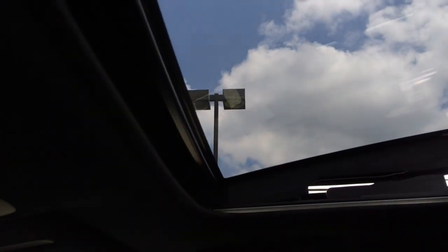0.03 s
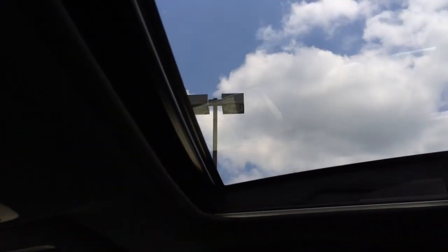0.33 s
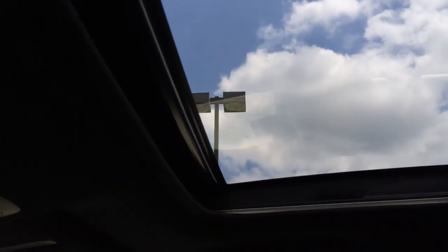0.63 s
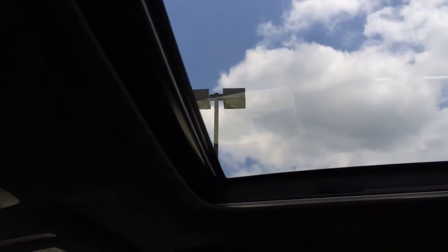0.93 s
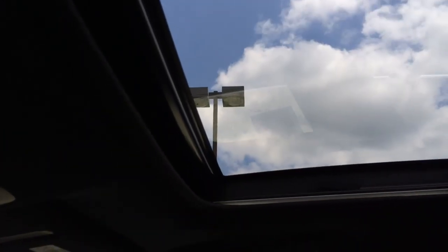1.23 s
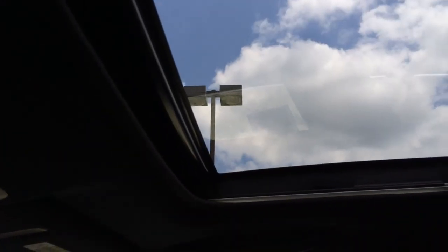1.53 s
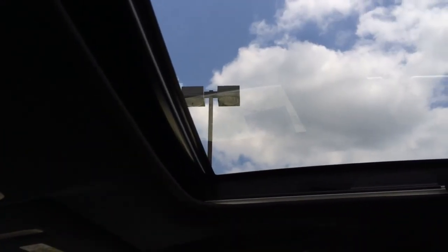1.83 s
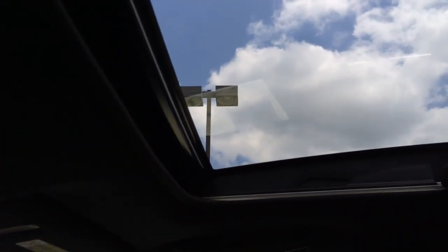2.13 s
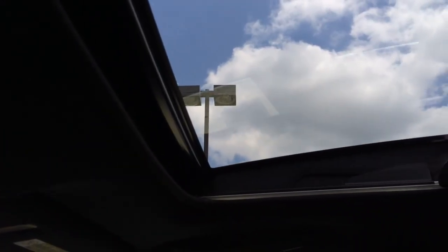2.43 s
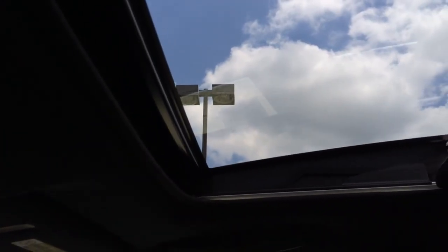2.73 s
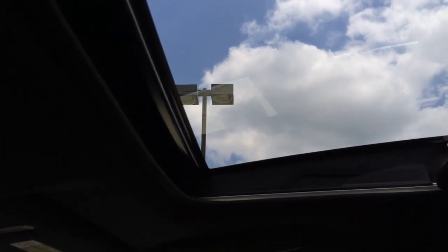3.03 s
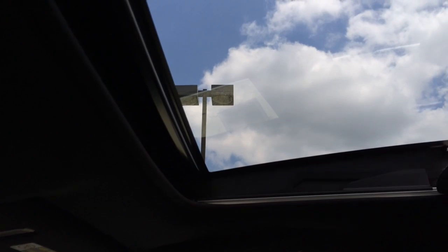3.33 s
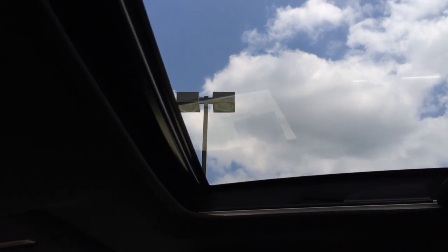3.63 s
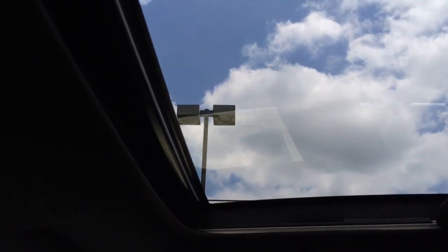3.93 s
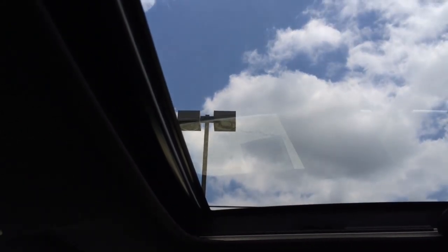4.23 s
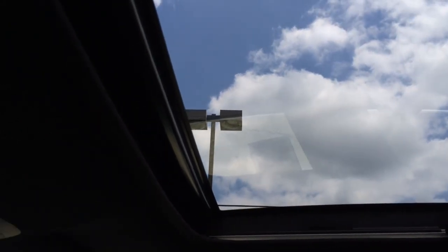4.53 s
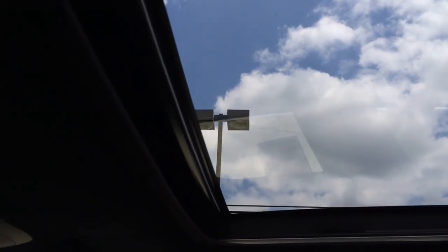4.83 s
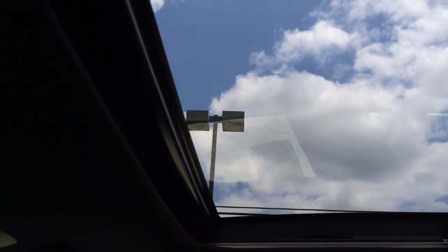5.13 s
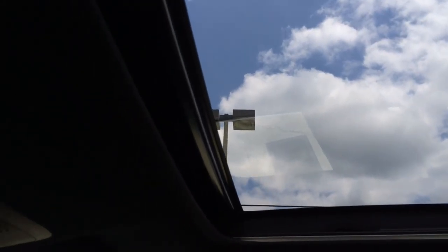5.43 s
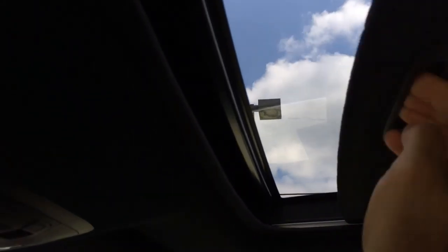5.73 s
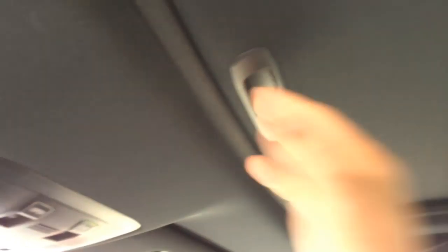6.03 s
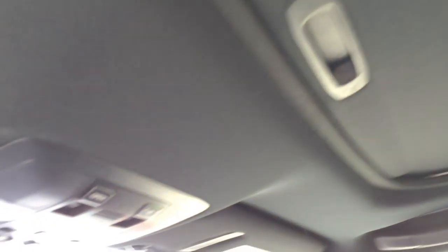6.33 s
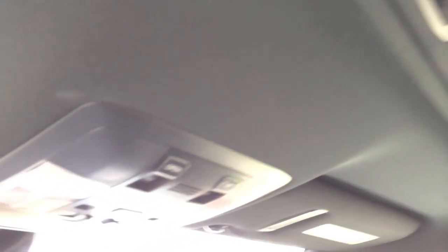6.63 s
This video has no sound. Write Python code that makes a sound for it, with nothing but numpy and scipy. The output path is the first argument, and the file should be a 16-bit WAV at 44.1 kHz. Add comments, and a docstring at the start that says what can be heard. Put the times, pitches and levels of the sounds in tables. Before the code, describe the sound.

Inside an idling car, a sunroof motor whines in three short runs with switch clicks, then the sunshade slides shut with a thump.

```python
"""A sunroof motor whines and sags under load, over the hum of an idling car and its blowing vents.
It runs three times: the lifting arms and the switch clack, and the glass bumps into its rubber seal.
Distant tyres roar through the gap, louder the wider the roof is open, and a sleeve rustles.
Then a hand slides the sunshade shut: fabric hisses along the rails and the shade booms on its stop."""
import sys
import numpy as np
from scipy import signal
from scipy.fft import rfft, irfft, next_fast_len
from scipy.io import wavfile
from scipy.ndimage import uniform_filter1d, map_coordinates

SR = 44100
rng = np.random.default_rng(int(sys.argv[2]) if len(sys.argv) > 2 else 0)


def generate_wav(signal):
    """Clip the signal to [-1, 1] and save it as 16-bit WAV at the path in sys.argv[1]."""
    frames = np.transpose(np.atleast_2d(signal))
    scaled = np.clip(frames, -1, 1) * 32767
    pcm = np.round(scaled).astype(np.int16)
    wavfile.write(sys.argv[1], SR, pcm)


N = 294134

# A COLOUR table says how strong a noise is at each frequency; t60 is the time to fade by 60 dB.
# when the motor runs: (start t/s, stop t/s)
MOTOR_RUNS = [(-.05, .865), (1.765, 2.345), (3.405, 3.92)]
# pitch of the whine, which follows motor speed, one list per run: (t/s, f/Hz)
WHINE_PITCH = [
    [(.06, 725), (.103, 672), (.16, 722), (.22, 744), (.26, 652), (.305, 727), (.39, 711), (.5, 720),
     (.55, 752), (.63, 721), (.82, 700)],
    [(1.8, 667), (1.92, 666), (1.99, 618.4), (2.07, 604), (2.105, 625.6), (2.205, 575), (2.24, 615),
     (2.265, 661), (2.34, 679)],
    [(3.41, 706), (3.53, 715), (3.585, 762), (3.68, 721.6), (3.82, 703), (3.92, 707)],
]
# how loudly the roof gives off the whine at each pitch: (f/Hz, level/dB)
WHINE_LOUDNESS = [(575, -40.5), (604, -39.5), (617, -42.5), (626, -51), (652, -55), (666, -38.5),
                  (690, -43), (718, -43.5), (735, -51), (760, -42)]
# side tones from the turning shaft: (multiple of the whine's pitch, level/dB before the housing)
SHAFT_TONES = [(.5, -61.5), (.9, -69), (1.118, -61.5), (1.885, -59.5), (2, -70)]
# the motor housing lifts some side tones and weakens others: (f/Hz, level/dB)
HOUSING_BOOST = [(600, 1), (750, -9), (795, 6), (835, 17.5), (900, -6), (1250, -7), (1370, 1.5),
                 (1600, -12)]
# hiss of the brushes, the motor's sliding contacts: (f/Hz, level/dB)
BRUSH_COLOUR = [(250, -2.5), (500, 4.5), (1100, 0), (1700, -5), (2500, -11), (3800, -11), (5000, -13.5),
                (6000, -12.5), (7000, -16.5), (9500, -20), (12000, -18.5), (13500, -23), (15000, -26)]

# tones of the idling engine: (multiple of the firing rate, level/dB)
ENGINE_TONES = [(1, -45.5), (2, -57), (3, -48), (4, -56), (6, -58.5)]
# low rumble in the car's body: (f/Hz, level/dB)
RUMBLE_COLOUR = [(22, -23), (31, -1.5), (45, -8), (70, 6.5), (88, -2), (120, 4), (165, -2.5), (200, -0.5),
                 (230, -4.5), (275, -15.5), (340, -17.5), (450, -22.5), (800, -63.5)]
# roar of moving air: (f/Hz, level/dB)
AIR_COLOUR = [(180, -34.5), (310, -1), (430, -8), (510, -3), (630, -8), (950, -2.5), (1150, -3.5),
              (1750, -7), (2250, -13), (3400, -26), (8000, -43), (11000, -40), (15000, -45)]
# hiss of the vents, stronger as they come into line: (t/s, level/dB)
VENT_HISS_LEVEL = [(5, -71), (5.9, -66.5), (6.29, -52.5), (6.4, -58.5), (6.5, -56.5), (6.66, -59.5)]
# outside sound let in by the roof gap: (t/s, share from 0 to 1)
ROOF_GAP = [(0, 1), (.45, 0.59), (.87, 0.09), (1.77, 0.15), (2.34, 0.75), (2.72, 0.82), (3.4, 0.52),
            (3.92, 0.06), (5.9, 0.16)]
# roar of distant tyres: (f/Hz, level/dB)
TYRE_COLOUR = [(600, -28), (850, 0.5), (960, 13), (1150, -2), (1400, 7.5), (1780, 8.5), (2050, -13),
               (3000, -30)]

# the lifting arms pass a notch: (t/s, first level/dB, second level/dB, glass level/dB, ring f/Hz)
ARM_NOTCHES = [(.078, -20.5, -30.5, -28.5, 1170), (.236, -32, -34, -25, 990),
               (.528, -26, -24.5, -24.5, 1700), (3.58, -22, -22.5, -21.5, 1620)]
# clack of the sunroof frame: (f/Hz, level/dB)
FRAME_COLOUR = [(400, -20.5), (650, 3.5), (820, -6), (1000, 2), (1100, -1), (1205, -1), (1320, -3.5),
                (1450, -0.5), (1700, -2), (2300, -13.5), (4000, -19.5), (8000, -64.5)]
# notes of the knocked roof panel: (f/Hz, level/dB, t60/s)
PANEL_NOTES = [(342, 2, 0.075), (392, -4.5, 0.057), (502, 3.5, 0.046)]
# snap of plastic: (f/Hz, level/dB)
SNAP_COLOUR = [(1200, -24), (2650, 7), (3100, 7.5), (3700, 5), (4500, 6), (5200, 2), (6500, -2),
               (9000, -9.5), (14000, -46)]
# thin, high tick of a hit: (f/Hz, level/dB)
TICK_COLOUR = [(4000, -16), (8000, -2), (12000, .5), (15500, -8)]
# clicks of switch, drive and handle; contact() turns each part down by its own amount:
# (t/s, clack level/dB, knock level/dB, snap level/dB, tick level/dB, ring f/Hz)
HARD_CLICKS = [(.292, -31.5, -37, -51, -59, 860), (.858, -26.5, -31, -43, -40.5, 2080),
               (1.242, -31, -35.5, -59, -50, 1410), (1.279, -34, -57, -39.5, -51, 1440),
               (1.681, -33.5, -42, -44, -59, 1720), (1.77, -2, -27.5, -15.5, -21, 1213),
               (2.335, -22.5, -42, -42, -46, 1374), (2.341, -18, -23, -26.5, -41, 2045),
               (2.611, -19.5, -33, -29.5, -44, 2260), (2.725, -31.5, -58, -39.5, -31.5, 2480),
               (3.393, -8.5, -21.5, -27, -52, 1783), (3.407, -13.5, -24, -26, -34.5, 660),
               (3.913, -28.5, -26.5, -42, -42.5, 1280), (4.333, -31.5, -60, -46.5, -51.5, 750.2),
               (5.234, -36.5, -42, -71, -62, 927), (5.26, -28.5, -30, -37.5, -66, 730)]
# the gears chatter as they take up their slack: (t/s, number of hits, first level/dB)
GEAR_CHATTER = [(1.734, 3, -21), (3.381, 1, -27)]

# the glass comes down on its seal: (t/s, level/dB)
GLASS_LANDINGS = [(0.605, -19.5), (3.655, -18.5)]
# one landing, edge first and then the whole pane: (delay t/s, added level/dB, f/Hz, t60/s)
SEAL_NOTES = [(0, -1, 181, .08), (.022, -3.5, 44.2, 0.51), (.025, -4, 105, .11)]
# drive or hand jolts the trim: (t/s, level/dB, f/Hz, t60/s)
TRIM_JOLTS = [(1.745, -29, 94, .2), (2.338, -29.5, 204.9, .12), (3.381, -28, 325, 0.055),
              (5.002, -35.5, 333, 0.14), (5.035, -23.5, 142, 0.11)]
# sleeve, fingers and seal rustle: (peak t/s, level/dB, rise t/s, fall t/s, lower edge f/Hz)
RUSTLE_SWELLS = [(.735, -53, 0.036, .02, 8970), (2.74, -53, .01, 0.069, 6984),
                 (2.81, -62, .01, 0.023, 5000), (3.05, -62.5, .08, 0.23, 8000), (4.36, -65, .03, .15, 6000),
                 (4.84, -67, .15, .4, 8040), (5.04, -56.5, 0.33, 0.091, 2500),
                 (5.152, -60, .01, 0.028, 3000), (5.224, -63.5, 0.016, 0.11, 2500),
                 (5.308, -59, .01, 0.035, 5000), (5.42, -56, .02, 0.021, 3000),
                 (6.06, -57, 0.04, .06, 7000), (6.66, -67, .6, .1, 7000)]
# hiss of rubbed fabric: (f/Hz, level/dB)
FABRIC_COLOUR = [(1500, -18), (3200, 3), (5000, 3), (9000, -1), (12000, 0), (15000, -5)]

# how hard the shade rubs, rising with its speed: (t/s, relative level/dB)
SHADE_RUBBING = [(5.45, -62), (5.488, -57), (5.616, -53), (5.648, -44.5), (5.78, -46.5), (5.818, -42.5),
                 (5.834, -45.5), (5.91, -42.5)]
# scrape of the shade's rails: (f/Hz, level/dB)
RAIL_SCRAPE_COLOUR = [(2000, -13.5), (3300, -24), (3900, -3), (4800, -1.5), (6300, -2), (7500, -7.5),
                      (12000, -11.5)]
# the shade hits its stop and bounces: (t/s, boom level/dB, crack level/dB)
SHADE_HITS = [(5.924, -18, -27.5), (5.9327, -6.5, -20), (5.958, -9.5, -53)]
# booming notes of the ceiling lining: (f/Hz, level/dB, t60/s)
LINING_NOTES = [(52.4, 5.5, 0.24), (73, 3.5, 0.12), (99, 1, 0.19), (136.6, 0, 0.22), (191, 0, 0.15),
                (272, -3, .08), (354, -4, 0.13), (443, -12, .11), (555, -16, .046)]
# crack of the shade's handle: (f/Hz, level/dB)
HANDLE_COLOUR = [(250, 1), (600, -1), (900, -0.5), (1500, -5), (1950, 2), (2400, -14.5), (3500, -16.5),
                 (7000, -16.5), (10000, -17), (15000, -27)]
# quick echoes from the windows: (delay t/s, level/dB)
WINDOW_ECHOES = [(.0021, -27.5), (.0037, -27), (.0058, -17.5), (.0083, -22)]


def amp(db):
    """Turn decibels into a number to multiply by."""
    return 10 ** (np.asarray(db) / 20)


def unit(x):
    """Scale a sound to an average strength (rms) of 1."""
    return x / np.sqrt(np.mean(x ** 2) + 1e-20)


def clock(size):
    """The time of each sample in seconds."""
    return np.arange(size) / SR


def curve(rows):
    """Join (t/s, value) points with straight lines, one value per sample."""
    return np.interp(clock(N), *np.transpose(rows))


def wobble(rate):
    """A smooth curve through `rate` random values a second."""
    knots = rng.standard_normal(int(N * rate / SR) + 4)
    return map_coordinates(knots, [np.arange(N) * rate / SR])


def colour(x, points):
    """Shape a sound's lows and highs to follow (f/Hz, level/dB) points."""
    size = 2 * next_fast_len(len(x) // 2 + 4096)
    hz, db = np.transpose(points)
    gain = amp(np.interp(np.log(np.fft.rfftfreq(size, 1 / SR) + 1), np.log(hz), db))
    # folding this onto its first half makes the filter ring after a hit, never before it
    cepstrum = irfft(np.log(gain))
    cepstrum[1:size // 2] *= 2
    cepstrum[size // 2 + 1:] = 0
    return irfft(rfft(x, size) * np.exp(rfft(cepstrum)))[:len(x)]


def treble(x, hz):
    """Keep what lies above hz."""
    return signal.sosfilt(signal.butter(2, hz, "highpass", fs=SR, output="sos"), x)


def noise(points):
    """Steady noise of strength 1 with the given colour."""
    return unit(colour(rng.standard_normal(N), points))


def crest(x):
    """Scale a hit so that its loudest 4 milliseconds have strength 1."""
    return x / np.sqrt(uniform_filter1d(x ** 2, size=176).max())


def add(track, s, sound):
    """Mix a sound in at s seconds."""
    part = track[round(s * SR):][:len(sound)]
    part += sound[:len(part)]


def motor():
    """The whine follows the motor's speed and swells where the roof rings along; the brushes hiss."""
    t, out = clock(N), np.zeros(N)
    brushes = noise(BRUSH_COLOUR)
    for (start, stop), pitch in zip(MOTOR_RUNS, WHINE_PITCH):
        running = np.clip((t - start) / 0.023, 0, 1) * np.clip((stop - t) / 0.01 + .5, 0, 1)
        hz = curve(pitch)
        phase = 2 * np.pi * np.cumsum(hz * (1 + 0.00602 * wobble(90))) / SR
        sides = sum(amp(db + np.interp(k * hz, *np.transpose(HOUSING_BOOST))) * np.sin(k * phase)
                    for k, db in SHAFT_TONES)
        sides *= amp(1.1 * wobble(26.36))
        whine_db = np.interp(hz, *np.transpose(WHINE_LOUDNESS)) + 1.1 * wobble(60)
        whine = np.sqrt(2) * (amp(whine_db) * np.sin(phase) + sides)
        surge_db = 7 * np.exp(-np.abs(t - start) / 0.058)  # the starting current lifts the hiss
        pulsing = 1 + 0.43 * np.sin(phase)  # the spinning contacts pass under the brushes
        out += running * (whine + amp(-51.5 + surge_db) * brushes * pulsing)
    return out


def engine(firing_hz=35.7):
    """The idling engine drones and rumbles through the car's body."""
    phase = 2 * np.pi * np.cumsum(firing_hz * (1 + 0.0083 * wobble(3))) / SR
    drone = sum(amp(db + 0.18 * wobble(14)) * np.sin(k * phase + rng.uniform(0, 2 * np.pi))
                for k, db in ENGINE_TONES)
    rumble = amp(-40.5 + 2.2 * wobble(5.9)) * noise(RUMBLE_COLOUR)
    return np.sqrt(2) * drone + rumble


def air(shut_db=-53.5, open_rise_db=4.5):
    """Air blows from the vents and past the roof, roaring more when the roof is open."""
    roar = amp(shut_db + open_rise_db * curve(ROOF_GAP) + 0.14 * wobble(4.76)) * noise(AIR_COLOUR)
    hiss = noise([(1200, -5.5), (3000, 1), (4500, -2), (7000, -9), (14000, -19.5)])
    return roar + amp(curve(VENT_HISS_LEVEL)) * hiss


def traffic(tread_hz=940):
    """Tyres roar and faintly sing outside, louder the wider the roof stands open."""
    phase = 2 * np.pi * np.cumsum(tread_hz * (1 + .018 * wobble(120) + .018 * wobble(6))) / SR
    singing = amp(2.5 * wobble(14)) * (np.sin(phase) + .55 * np.sin(1.68 * phase))
    return amp(-49.5) * curve(ROOF_GAP) * (noise(TYRE_COLOUR) + amp(-9) * singing)


def ring(notes, scatter_db=0):
    """A struck part rings with fading notes; scatter_db varies their strengths from hit to hit."""
    t = clock(SR // 4)
    out = np.zeros(len(t))
    for k, (hz, db, t60) in enumerate(notes):
        fade = amp(db + scatter_db * rng.standard_normal() - 60 * t / t60)
        out += (-1) ** k * fade * np.sin(2 * np.pi * hz * t)
    return crest(out)


def burst(points, t60, sharp):
    """A hit and its dense, short echoes in the car: a sharp one starts with a spike, a soft one swells."""
    t, sharp = clock(SR // 4), np.clip(sharp, 0, 1)
    swell = 1 - np.exp(-t / (0.00064 * (1 - sharp) + 1 / SR))
    near_echoes = 1 + 1.36 * sharp * np.exp(-t / 0.0029)
    hit = rng.standard_normal(len(t)) * swell * near_echoes * amp(-60 * t / t60)
    hit[0] += 24 * sharp ** 2
    return crest(colour(hit, points))


def contact(db, knock_db, snap_db, tick_db, hz):
    """One hit rings the frame and the struck part, knocks the roof panel, snaps and ticks."""
    sharp = 1 + db / 44  # harder hits are sharper; at -44 dB they only glance
    return (amp(db - 10) * burst(FRAME_COLOUR, t60=0.095, sharp=sharp)
            + amp(db - 16) * ring([(hz, 0, .052)])
            + amp(knock_db - 6) * ring(PANEL_NOTES, scatter_db=6)
            + amp(snap_db - 2) * burst(SNAP_COLOUR, t60=0.072, sharp=sharp)
            + amp(tick_db - 5) * burst(TICK_COLOUR, t60=0.081, sharp=sharp))


def bump(db, hz, t60):
    """Rubber cushions this blow: a low note that swells and dies."""
    t = clock(SR // 2)
    swell = (1 - np.exp(-t / 0.0021)) ** 2
    return amp(db - 2) * crest(swell * amp(-60 * t / t60) * np.sin(2 * np.pi * hz * t))


def lifting_arms(gap_s=.02):
    """At each notch the arms strike twice; the second blow is duller and shakes the glass."""
    out = np.zeros(N)
    for s, first_db, second_db, glass_db, hz in ARM_NOTCHES:
        add(out, s, contact(first_db, knock_db=-31, snap_db=first_db - 28, tick_db=-57, hz=hz))
        second = contact(second_db, knock_db=-25.5, snap_db=second_db - 32, tick_db=-64, hz=hz)
        add(out, s + gap_s, second)
        add(out, s + gap_s, bump(glass_db, hz=166.8, t60=0.1))
    return out


def switch_and_drive(chatter_gap_s=.0105, chatter_rise_db=5.5):
    """Switch, drive and handle click; gears chatter before a restart and the panel rocks after a stop."""
    out = np.zeros(N)
    for s, db, knock_db, snap_db, tick_db, hz in HARD_CLICKS:
        add(out, s, contact(db, knock_db, snap_db, tick_db, hz))
    for s, count, first_db in GEAR_CHATTER:
        for k in range(round(count)):
            db = first_db + k * chatter_rise_db
            hit = contact(db, knock_db=-29, snap_db=db - 20.5, tick_db=-42, hz=1032)
            add(out, s + k * chatter_gap_s, hit)
    for _, stop in MOTOR_RUNS:
        add(out, stop + 0.0031, amp(-29) * ring(PANEL_NOTES, scatter_db=2))
    return out


def glass_and_trim():
    """The glass lands on its seal the same way each time; drive and hand jolt the trim."""
    out = np.zeros(N)
    for s, db in GLASS_LANDINGS:
        for delay, part_db, hz, t60 in SEAL_NOTES:
            add(out, s + delay, bump(db + part_db, hz, t60))
    for s, db, hz, t60 in TRIM_JOLTS:
        add(out, s, bump(db, hz, t60))
    return out


def rustles():
    """Each rustle swells and fades by 20 dB over its rise and fall, fluttering with the cloth's folds."""
    t, out = clock(N), np.zeros(N)
    cloth = amp(2 * wobble(50)) * noise(FABRIC_COLOUR)
    for s, db, rise, fall, hz in RUSTLE_SWELLS:
        below_peak_db = 20 * np.maximum((s - t) / rise, (t - s) / fall)
        out += amp(db - below_peak_db) * unit(treble(cloth, hz))
    return out


def sunshade(start_s=5.43, end_s=5.95):
    """Fabric hisses faster and faster along the rails until the shade booms against its stop."""
    t = clock(N)
    moving = np.clip((t - start_s) / .03, 0, 1) * np.clip((end_s - t) / .021, 0, 1)
    speed_db = curve(SHADE_RUBBING) + 45  # about 0 at full speed
    fabric = amp(-51.5 + 0.53 * speed_db) * noise(FABRIC_COLOUR)
    grip = amp(1.6 * wobble(140))
    rails = amp(-45 + 1.54 * speed_db) * grip * noise(RAIL_SCRAPE_COLOUR)
    out = moving * (fabric + rails)
    # the bounce pulls the ceiling lining back the other way
    for push, (s, boom_db, crack_db) in zip([1, 1, -1], SHADE_HITS):
        add(out, s, push * amp(boom_db) * ring(LINING_NOTES))
        add(out, s, amp(crack_db) * burst(HANDLE_COLOUR, t60=0.065, sharp=0.49))
    # the first touch on the rubber buffer is a short, dead knock
    add(out, SHADE_HITS[0][0], amp(-10) * ring([(272, 0, 0.027), (420, -1.2, .01)]))
    return out


def windows(x):
    """The nearby windows throw back the treble and make it sound boxy."""
    out, bright = x.copy(), treble(x, hz=1700)
    for delay, db in WINDOW_ECHOES:
        add(out, delay, amp(db) * bright)
    return out


def scene():
    """Everything in one channel, heard from the seat under the roof."""
    roof = motor() + switch_and_drive() + lifting_arms() + glass_and_trim() + sunshade()
    return windows(roof + rustles() + engine() + air() + traffic())[None]


def record(dry, limit_db=-15, react_s=0.1, recover_db_per_s=13.5, top_hz=15500):
    """Automatic volume control dips after a loud boom and recovers slowly; the highest treble is cut."""
    power = np.abs(uniform_filter1d(dry[0] ** 2, size=SR // 25))
    excess_db = np.maximum(10 * np.log10(power + 1e-12) - limit_db, 0)
    recovery_db = recover_db_per_s * clock(N)
    held_db = np.maximum.accumulate(excess_db + recovery_db) - recovery_db  # each peak drains away
    step = 1 / (react_s * SR)
    dip_db = signal.lfilter([step], [1, step - 1], held_db)
    size = next_fast_len(N + SR // 2)
    below_top = np.fft.rfftfreq(size, 1 / SR) < top_hz
    return irfft(rfft(dry * amp(-dip_db), size) * below_top, size)[..., :N]


dry = scene()
out = record(dry)
generate_wav(out)
```